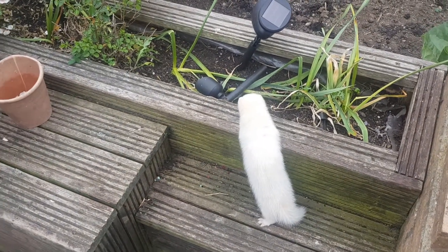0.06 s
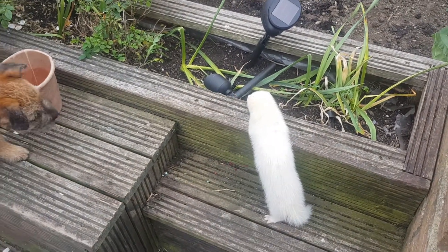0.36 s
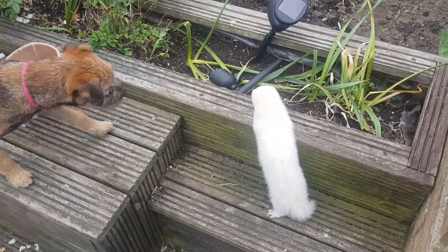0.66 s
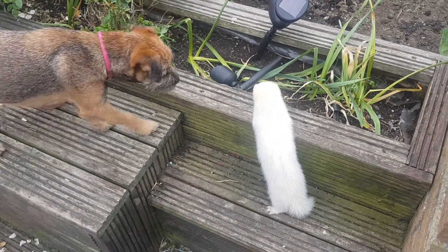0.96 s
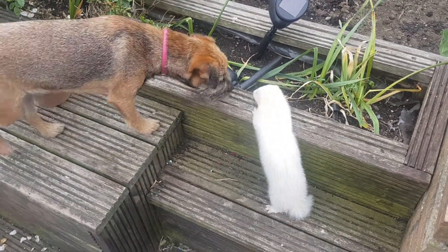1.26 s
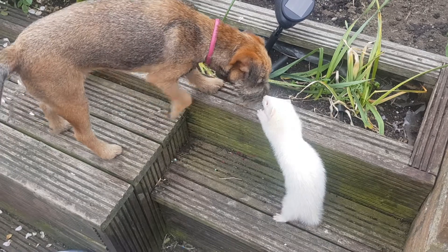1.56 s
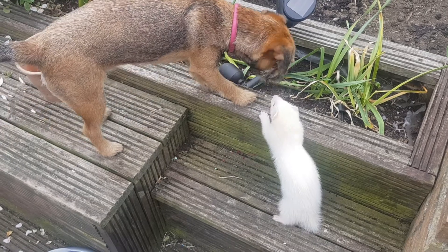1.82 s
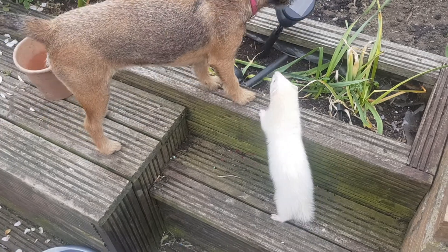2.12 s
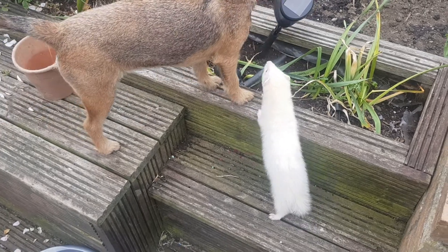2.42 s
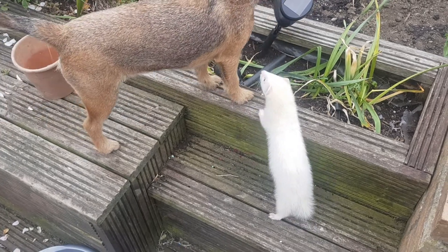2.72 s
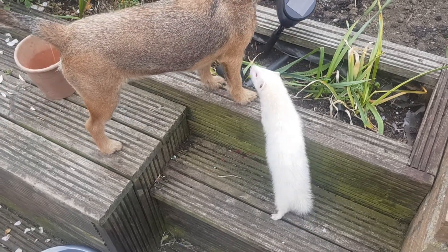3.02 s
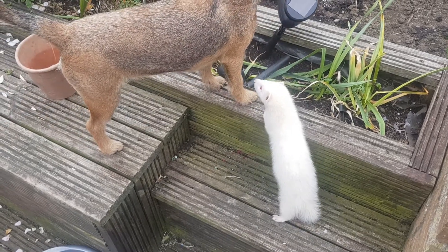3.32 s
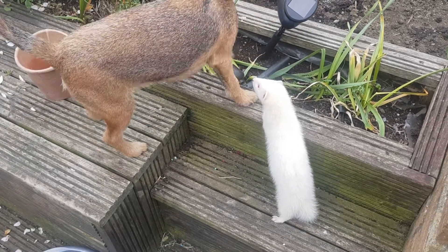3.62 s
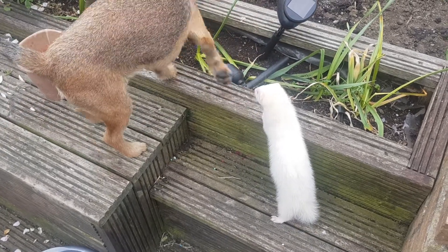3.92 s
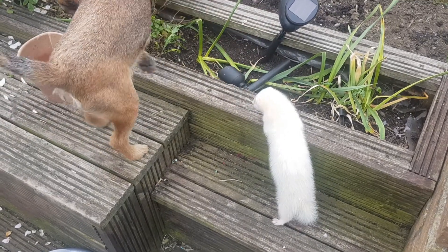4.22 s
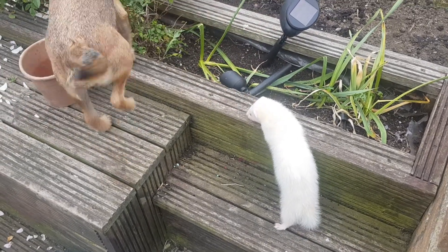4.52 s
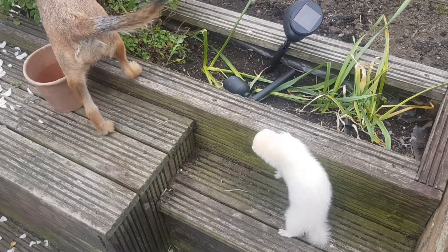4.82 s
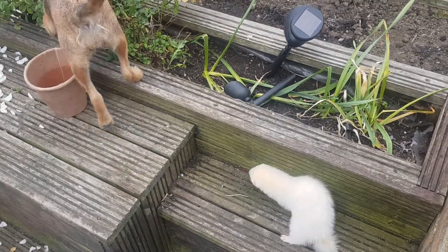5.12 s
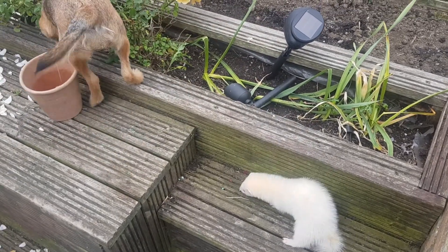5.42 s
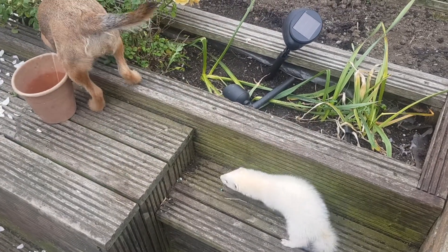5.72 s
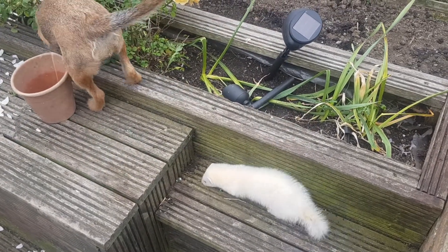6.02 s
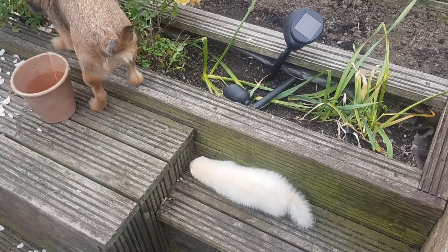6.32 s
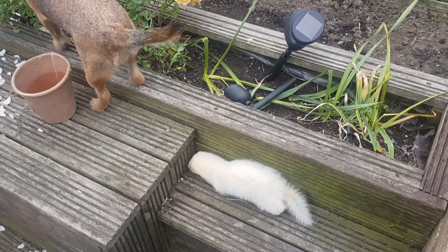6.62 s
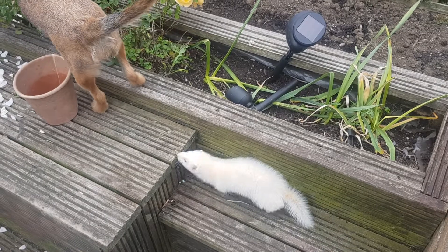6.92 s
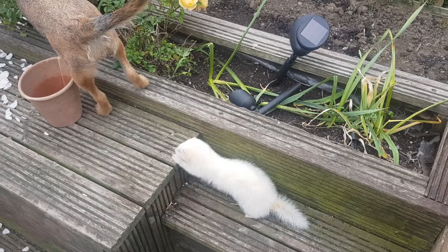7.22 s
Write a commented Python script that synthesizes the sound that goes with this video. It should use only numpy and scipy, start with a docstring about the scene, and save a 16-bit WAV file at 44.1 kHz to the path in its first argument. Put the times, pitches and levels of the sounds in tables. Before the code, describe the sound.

Light dog steps on boards, occasional bird chirps and distant traffic, then a bumped clay flower pot knocks, wobbles and settles.

```python
"""A dog's claws tick and its paws thud and scuff on wooden decking in a quiet garden; it whines faintly.
Late in the walk it bumps a clay flower pot, which rocks and settles: each impact excites damped modes
of the clay and the boards. A small bird repeats one chirp, a gliding tone that echoes off the fences,
and others whistle far away. Beneath them traffic rumbles over a faint noise floor, and a soft high hiss
swells as leaves stir and briefly around chirps and paw scuffs."""
import sys
import numpy as np
from scipy import signal
from scipy.fft import rfft, irfft
from scipy.io import wavfile

SR = 44100
rng = np.random.default_rng(int(sys.argv[2]) if len(sys.argv) > 2 else 0)


def inscribe(sig):
    """Save sig as 16-bit PCM at rate SR to the path in sys.argv[1].

    A 1-D sig is mono; a 2-D sig holds one channel per row.
    Samples are clipped to [-1, 1] before scaling.
    """
    pcm = np.round(np.clip(np.atleast_2d(sig).T, -1, 1) * 32767)
    wavfile.write(sys.argv[1], SR, pcm.astype(np.int16))


N = 328986
TIME = np.arange(N) / SR

# Levels in the tables are relative; each source applies its own gains.
# pot striking the deck: (time [s], level [dB], board gain [dB], clay gain [dB], thunk pitch [Hz])
POT_KNOCKS = [(5.4459, -17.5, -1, 6.5, 550), (5.4585, -10, 0.5, 5, 540), (5.4691, -11.5, 4.5, 7, 560),
              (5.4757, -17.5, 5, 11.5, 334), (5.5733, -17.5, -1, -6, 505), (6.1664, -24, 0, -6, 576),
              (6.1778, -21, 1, -6, 500), (6.375, -21, 6.5, 4, 656), (6.3816, -11, 0, 3.5, 563),
              (6.3984, -18, -3, -20, 414), (6.5556, -13.5, 0, 3, 500), (6.667, -25, 9.5, -6, 644),
              (6.6766, -15, 2.5, -1.5, 498), (6.7562, -22.5, -4, -12.5, 540), (6.7839, -25, 1, -6, 497),
              (6.7963, -21, 9.5, -0.5, 583), (6.8333, -24.5, -3, -9.5, 553), (6.864, -31, -12, 0, 650),
              (6.875, -24, 3.5, -4, 506), (6.9629, -34.5, 7.5, -5, 500), (7.0134, -30, 5, -15, 380),
              (7.054, -40, 4, -15, 450), (7.081, -33, 4, -13, 453)]
# modes of the boards, of pot and board together, and of the clay: (frequency [Hz], level [dB], T60 [s])
DECK_MODES = [(74.6, -27, 0.5), (124, -30, 0.22), (196, -30, 0.16), (230, -29, 0.14), (286, -10, 0.125),
              (326.4, -19, 0.15), (351.2, -19, 0.13), (416, -17, 0.05)]
COUPLED_MODES = [(540, -27, 0.08), (582, -18.5, 0.11), (690, -22, 0.045), (760, -15, 0.04),
                 (830, -25, 0.04), (1065, -27, 0.045), (1394, -28, 0.024)]
CERAMIC_MODES = [(1732, -38, 0.05), (2390, -27, 0.025), (2670, -29, 0.04), (2790, -34, 0.035),
                 (3300, -28, 0.012), (3900, -31, 0.012), (4960, -37, 0.011)]
# claws striking wood: (time [s], level [dB], low-pass cutoff [Hz])
CLAW_TICKS = [(0.1585, -30, 2500), (0.495, -33, 6800), (0.574, -46, 4800), (.778, -59, 15000),
              (1.167, -41.5, 6600), (1.854, -56, 9000), (3.538, -43.5, 12000), (4.249, -47, 9200),
              (4.425, -50, 15000), (4.714, -38.5, 14100), (4.918, -39.5, 6400), (5.376, -43, 8000),
              (6.34, -40.5, 15500), (6.508, -38, 15800)]
# pads striking a board: (time [s], level [dB], frequency [Hz], decay by 60 dB [cycles])
PAD_THUDS = [(.1585, -22.5, 456, 2.5), (0.4985, -32.5, 110, 18), (0.574, -38, 99, 9.5),
             (6.345, -32, 500, 19)]
# paws sliding over the grooves: (time [s], duration [s], level [dB], resonance [Hz])
PAW_SCUFFS = [(0.163, 0.17, -49.5, 854), (1.672, 0.43, -67.5, 5960), (2.785, 0.04, -57.5, 5200),
              (3.493, 0.078, -54, 3480), (3.894, 0.07, -60, 7140), (4.294, 0.084, -60, 6230),
              (4.563, 0.16, -60, 5900), (4.971, 0.12, -51, 6200), (5.012, 0.3, -58, 12100),
              (5.389, 0.21, -47.5, 4070), (5.542, 0.039, -41.5, 2820), (6.271, 0.044, -48, 3330),
              (6.351, 0.034, -48.5, 11000), (6.491, 0.037, -51, 13500)]
# noise of clay impact, claw impact and paw friction: (frequency [Hz], spectral density [dB])
CRACK_SPECTRUM = [(300, -17), (800, 18), (1600, 0.5), (2800, 10.5), (3800, -5), (5000, -8), (8000, -28),
                  (15000, -29)]
TICK_SPECTRUM = [(500, 13), (1500, -1.5), (2800, 6.5), (4000, -0.5), (6500, 4.5), (8500, -2.5), (11000, 2),
                 (15500, -19)]
SCUFF_SPECTRUM = [(100, -10), (300, 25), (800, 10.5), (1600, 7), (3000, 5.5), (6500, 2), (8500, -5),
                  (11000, -3.5), (15500, -10)]
# the small bird's calls: (time [s], level [dB], plateau pitch [Hz])
BIRD_CHIRPS = [(2.096, -41, 4630), (3.613, -41, 4710), (5.659, -38, 4668), (7.221, -42.5, 4680)]
# a chirp's three syllables: (time in the chirp [s], pitch over plateau pitch [ratio], level [dB])
LEAD_IN_GLIDE = [(.002, 1.54, -22), (.025, 1.57, -20), (.029, 1.2, -20), (.045, 1.17, -7), (.056, 1.2, -14)]
PLATEAU_GLIDE = [(.048, .7, -12), (.054, .82, -5), (.059, .96, 0), (.072, 1.0, -1), (.089, .97, -1),
                 (.094, .73, -2), (.101, .67, -4), (.112, .72, -8)]
HOOK_GLIDE = [(.124, .67, -7), (.132, .74, -1), (.141, .83, -3), (.149, .91, -4), (.155, .72, -3),
              (.162, .66, -1), (.171, .68, -8)]
# reflections off ground, fences and walls: (delay [s], level [dB])
ECHO_PATHS = [(.003, 0), (.012, -6), (.056, -5), (.08, -9), (.111, -11), (.136, -9)]
# thin whistles, a dog's faint whine (the rows from 0.81 to 0.971 s) and distant birds' notes:
# (time [s], duration [s], first pitch [Hz], last pitch [Hz], level [dB], warble [Hz], mid rise [ratio])
THIN_WHISTLES = [ (0.148, 0.09, 4320, 3835, -49, 226, 0.017), (.81, 0.44, 1119, 1122, -58, 39.5, 0.044),
                 (0.842, 0.14, 4490, 4230, -61.5, 55.56, 0), (0.971, 0.46, 4330, 4510, -70, 160, 0),
                 (1.08, .09, 10200, 11300, -76, 240, .01), (1.25, .12, 13200, 14150, -70, 70, 0.021),
                 (1.32, .09, 11800, 11800, -73, 110, .015), (1.51, .1, 9700, 10000, -74, 70, .025),
                 (1.69, 0.046, 5900, 6060, -66, 150, 0), (1.81, 0.078, 6000, 6100, -64.5, 150, 0),
                 (2.64, 0.22, 4450, 4450, -67, 348, 0.0039), (3.057, 0.33, 2074, 2220, -68.5, 93, 0.0047),
                 (3.25, 0.245, 4560, 4470, -72.5, 330, 0.0011),
                 (3.258, 0.28, 2110, 2170, -62.5, 150, 0.028), (3.51, 0.11, 2263, 2415, -55, 28, 0.024),
                 (3.579, 0.068, 2170, 1680, -60, 20, .02), (3.636, 0.091, 13400, 13900, -74, 120, 0.016),
                 (3.76, 0.17, 10900, 11400, -78, 200, 0.015), (3.949, 0.058, 3250, 3400, -52.5, 25, .01),
                 (4.188, 0.074, 2740, 2860, -64, 74.07, 0.0099),
                 (4.353, 0.084, 2814, 2650, -64.5, 97.2, 0.027),
                 (4.561, 0.027, 2034, 2060, -56, 126, 0.011), (4.6, 0.23, 2416, 2470, -63.5, 240, 0.0038),
                 (4.725, 0.21, 2376, 2616, -54.5, 30, 0.037), (5.013, 0.34, 1950, 1813, -63.5, 80.6, 0.017),
                 (5.256, 0.57, 2284, 2390, -61.5, 138.9, 0.011)]
# swells of soft high hiss, from leaves stirring and as brief brightness around chirps and paw scuffs:
# (peak time [s], 1/e half-width [s], level [dB])
HISS_SWELLS = [(.25, 0.26, -59), (1.45, 0.63, -67), (3.7, 0.15, -60.5), (4.65, 0.44, -69.5),
               (5.6, 0.23, -61.5), (6.35, 0.28, -62.5)]
# background noises: (frequency [Hz], spectral density [dB])
TRAFFIC_SPECTRUM = [(20, -15.5), (32, -2.5), (48, 1.5), (75, -1.5), (120, -7), (170, -9.5), (280, -6.5),
                    (420, -11.5), (620, -14.5), (1000, -17.5), (1500, -25.5), (2200, -39), (3500, -41),
                    (8000, -50)]
SWELL_SPECTRUM = [(1500, 7.5), (2800, 1), (4500, 8), (7400, 0), (8400, -6.5), (10500, -3), (15500, -8.5)]
FLOOR_SPECTRUM = [(2000, -32), (7500, -0.5), (8500, -14), (10000, -4), (15500, -5.5)]
# likeness of noise at the two ears: (frequency [Hz], correlation [ratio])
EAR_CORRELATION = [(40, 0.98), (300, 1), (600, 1), (1200, 0.32), (2500, 0.033), (15000, 0.027)]


def from_db(db):
    """Amplitude grows tenfold for every 20 dB."""
    return 10 ** (np.asarray(db) / 20)


def rms_one(x):
    """Normalisation to unit mean power."""
    return x / np.sqrt(np.mean(x ** 2) + 1e-20)


def seconds(length):
    """Uniform sampling of a duration."""
    return np.arange(int(length * SR)) / SR


def at_hz(points, hz):
    """Interpolation on a logarithmic frequency axis."""
    knot_hz, values = np.transpose(points)
    return np.interp(np.log(hz + 1), np.log(knot_hz), values)


def add(out, start_s, sound):
    """Superposition: a sound adds to those already present."""
    start = max(round(start_s * SR), 0)
    out[..., start:start + sound.shape[-1]] += sound[..., :N - start]


def drift(t, per_s):
    """Random modulation: straight lines join per_s Gaussian values a second."""
    knots = rng.standard_normal(4096)
    return np.interp(t * per_s, np.arange(len(knots)), knots)


def correlated_pair(mid, side, correlation):
    """Partial coherence: the ears share one signal and take another in opposite sign."""
    return np.sqrt(1 + correlation) * mid + np.sqrt(1 - correlation) * side * [[1], [-1]]


def noise(spectrum):
    """Spectral shaping gives stereo noise of unit rms, coherent only at low frequencies."""
    hz = np.arange(N // 2 + 1) * SR / N
    mid, side = rfft(rng.standard_normal((2, N)))
    pair = correlated_pair(mid, side, at_hz(EAR_CORRELATION, hz))
    return rms_one(irfft(pair * from_db(at_hz(spectrum, hz)), N))


def tone(hz, db, attack_s, release_s):
    """Frequency modulation: the phase of a soft-ended sine is the integral of its frequency."""
    t = np.arange(len(hz)) / SR
    ramp = np.clip(np.minimum(t / attack_s, (t[-1] - t) / release_s), 0, 1)
    phase = 2 * np.pi * np.cumsum(hz) / SR
    return np.sqrt(2) * np.sin(phase) * from_db(db) * np.sin(ramp * np.pi / 2)


def scatter(x, t60, correlation):
    """Diffuse reverberation: convolution with decaying noise of unit mean energy per ear."""
    t = seconds(1)
    build_up = 1 - np.exp(-t / .015)
    mid, side = rng.standard_normal((2, len(t))) * from_db(-60 * t / t60) * build_up
    response = correlated_pair(mid, side, correlation)
    response /= np.sqrt(np.sum(response ** 2) / 2)
    return signal.fftconvolve(np.atleast_2d(x), response, axes=1)[:, :N]


def lagged(pair, lag_ms):
    """Interaural delay: a positive lag reaches the right ear later."""
    return np.array([pair[0], np.interp(TIME - lag_ms / 1000, TIME, pair[1])])


def flower_pot(give_s=.0007, thunk_db=6, thunk_t60=.013, crack_db=-14, crack_t60=.02):
    """Impact excitation: each knock of the rocking pot thunks, cracks and rings clay and boards."""
    pot, deck, crack_envelope = np.zeros((3, N))
    t = seconds(.5)
    for start, db, board_db, clay_db, thunk_hz in POT_KNOCKS:
        blow = from_db(db) * (1 - np.exp(-(t / give_s) ** 2))   # the wood yields, softening the onset
        thunk = from_db(thunk_db - 60 * t / thunk_t60) * np.sin(2 * np.pi * thunk_hz * t)
        ringing = ring(COUPLED_MODES, t) + from_db(clay_db) * ring(CERAMIC_MODES, t)
        add(pot, start, blow * (thunk + ringing))
        add(deck, start, blow * from_db(board_db) * ring(DECK_MODES, t))
        add(crack_envelope, start, blow * from_db(clay_db + crack_db - 60 * t / crack_t60))
    pot = pot + crack_envelope * noise(CRACK_SPECTRUM)
    near = from_db(-11) * scatter(pot, t60=.12, correlation=.8)   # off the steps and planter
    far = from_db(-24) * scatter(pot + deck, t60=1, correlation=.84)   # off the garden walls
    return lagged(pot + deck + near + far, lag_ms=.2) * from_db([[.3], [-.3]])


def ring(modes, t, spread_db=2, detune=.015):
    """Free vibration: damped modes sum, varying in strength and pitch per blow as the pot tilts."""
    hz, db, t60 = np.transpose(modes)[:, :, None]
    envelopes = from_db(db + spread_db * rng.standard_normal(db.shape) - 60 * t / t60)
    hz = hz * (1 + detune * rng.standard_normal(hz.shape))
    signs = (-1) ** np.arange(len(modes))
    return signs @ (envelopes * np.sin(2 * np.pi * hz * t))


def dog():
    """Impact and friction of the paws reach the ear directly and by diffuse reflection."""
    steps = claw_ticks() + pad_thuds() + paw_scuffs()
    reflections = from_db(-12) * scatter(steps, t60=.29, correlation=1)
    return (steps + reflections) * from_db([[1.4], [-1.4]])


def claw_ticks(t60=.039):
    """A hard, brief contact excites a broad band of noise that decays quickly."""
    ticks, t = np.zeros((2, N)), seconds(.3)
    contact = noise(TICK_SPECTRUM)
    for start, db, cutoff_hz in CLAW_TICKS:
        tick = contact[:, int(start * SR):][:, :len(t)] * from_db(db - 60 * t / t60)
        add(ticks, start, signal.sosfilt(signal.butter(2, cutoff_hz, fs=SR, output="sos"), tick))
    return ticks


def pad_thuds():
    """A board struck by a soft pad responds as a single damped oscillator."""
    thuds, t = np.zeros(N), seconds(.3)
    for start, db, hz, cycles in PAD_THUDS:
        add(thuds, start, from_db(db - 60 * t * hz / cycles) * np.sin(2 * np.pi * hz * t))
    return thuds


def paw_scuffs(grain_db=3.5, resonance_db=7):
    """Sliding friction makes grainy noise, with one band emphasised in each scuff."""
    scuffs = np.zeros((2, N))
    friction = noise(SCUFF_SPECTRUM) * from_db(grain_db * drift(TIME, 200))
    for start, length, db, hz in PAW_SCUFFS:
        t = seconds(length)
        rub = friction[:, int(start * SR):][:, :len(t)]
        band = from_db(resonance_db) * signal.lfilter(*signal.iirpeak(hz, Q=3, fs=SR), rub)
        envelope = from_db(db) * np.sin(np.pi * np.sqrt(t / length))
        add(scuffs, start, envelope * rms_one(rub + band))
    return scuffs


def small_bird(rasp_share=.07, rasp_db=4, wander_share=.018, fade_s=.004, beam_hz=2800):
    """Fast random modulation roughens three glides; the high notes carry best to the fences."""
    song = np.zeros(N)
    for start, level_db, plateau_hz in BIRD_CHIRPS:
        for syllable in (LEAD_IN_GLIDE, PLATEAU_GLIDE, HOOK_GLIDE):
            times, pitch, db = np.transpose(syllable)
            t = seconds(times[-1] - times[0])
            glide = np.interp(times[0] + t, times, pitch)
            height = np.minimum(glide, 1)   # rasp and overtone weaken below the plateau
            rasp = rasp_share * height ** 2 * drift(t, 2200)
            hz = plateau_hz * glide * (1 + rasp + wander_share * drift(t, 96.7))
            note_db = level_db + np.interp(times[0] + t, times, db) + rasp_db * drift(t, 613)
            octave_db = note_db - 27 + 80 * np.log2(height)
            note = tone(hz, note_db, fade_s, fade_s) + tone(2 * hz, octave_db, fade_s, fade_s)
            add(song, start + times[0], note)
    beamed = signal.sosfilt(signal.butter(1, beam_hz, "high", fs=SR, output="sos"), song)
    echoes = from_db(2.5) * fence_echoes(beamed)
    diffuse = from_db(3.5) * scatter(beamed, t60=.5, correlation=.1)
    return from_db(-8) * (song + echoes + diffuse) * from_db([[-1], [1]])


def fence_echoes(song, smear_t60=.032):
    """Reflection from many slats spreads each echo into a tight cluster, distinct at each ear."""
    response, t = np.zeros((2, N)), seconds(smear_t60)
    for delay, db in ECHO_PATHS:
        cluster = rng.standard_normal((2, len(t))) * from_db(-60 * t / smear_t60)
        add(response, delay, from_db(db) * rms_one(cluster) / np.sqrt(len(t)))
    return signal.fftconvolve(song[None], response[:, :SR // 2], axes=1)[:, :N]


def thin_whistles(waver_db=1.5, attack_share=.14, release_share=.56):
    """Diffuse reflection blurs warbled glides: a dog's faint whine and distant birds' notes."""
    notes = np.zeros(N)
    for start, length, first_hz, last_hz, db, warble_hz, rise in THIN_WHISTLES:
        t = seconds(length)
        arch = 1 + rise * np.sin(np.pi * t / length)
        hz = np.interp(t, [0, length], [first_hz, last_hz]) * arch + warble_hz * drift(t, 250)
        note_db = db + waver_db * drift(t, 60)
        add(notes, start, tone(hz, note_db, attack_share * length, release_share * length))
    return from_db(-6) * notes + from_db(-5) * scatter(notes, t60=.19, correlation=.084)


def traffic(level_db=-48.5, fade_db_per_s=.16, flutter_db=1.53):
    """Level falls with distance: far traffic slowly recedes, reaching the right ear first."""
    receding_db = fade_db_per_s * (TIME.mean() - TIME)
    rumble = noise(TRAFFIC_SPECTRUM) * from_db(level_db + receding_db + flutter_db * drift(TIME, 14))
    return lagged(rumble, lag_ms=-.33)


def swelling_hiss(rest_db=-78.5, flutter_db=2):
    """Amplitude modulation of soft high hiss: leaves stirring, and brightness around chirps and scuffs."""
    swells = sum(from_db(db) * np.exp(-((TIME - peak) / width) ** 2) for peak, width, db in HISS_SWELLS)
    hiss = noise(SWELL_SPECTRUM) * (from_db(rest_db) + swells)
    return hiss * from_db(flutter_db * (drift(TIME, 30) + drift(TIME, 150)))


def noise_floor(level_db=-75):
    """A microphone's self-noise forms a steady floor in the treble."""
    return from_db(level_db) * noise(FLOOR_SPECTRUM)


def scene():
    """Sound pressures add: birds, pot and dog over the garden's background."""
    events = small_bird() + thin_whistles() + flower_pot() + dog()
    return events + (traffic() + swelling_hiss() + noise_floor()) * from_db([[.4], [-.4]])


def record(dry):
    """Band limiting: an elliptic low-pass cuts steeply above 15.9 kHz."""
    return signal.sosfilt(signal.ellip(10, .1, 70, 15900, fs=SR, output="sos"), dry)


dry = scene()
out = record(dry)
inscribe(out)
```